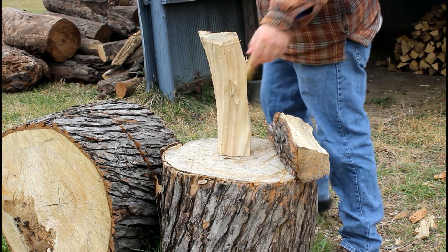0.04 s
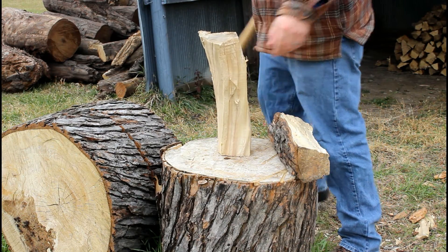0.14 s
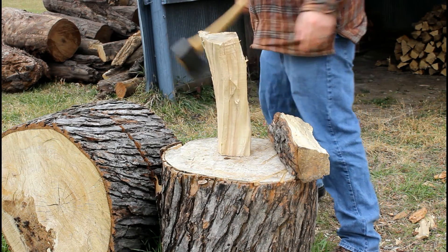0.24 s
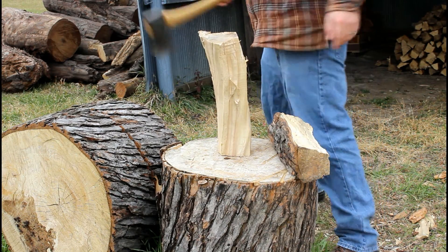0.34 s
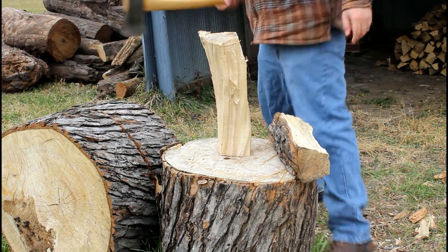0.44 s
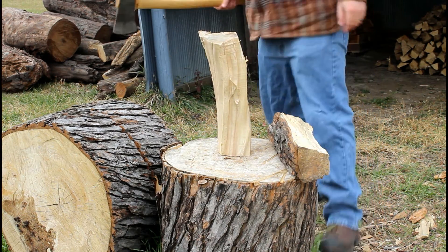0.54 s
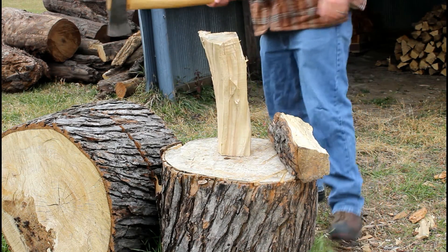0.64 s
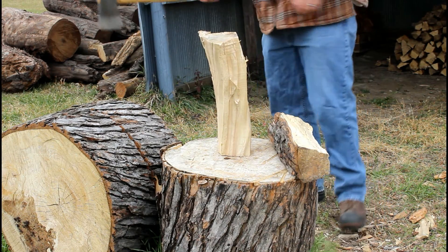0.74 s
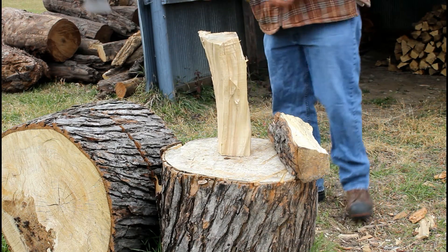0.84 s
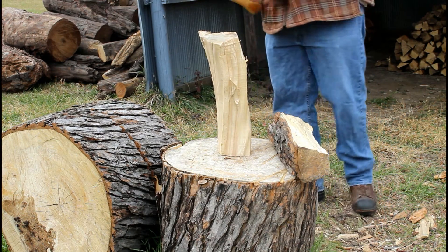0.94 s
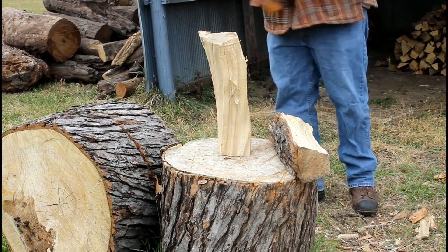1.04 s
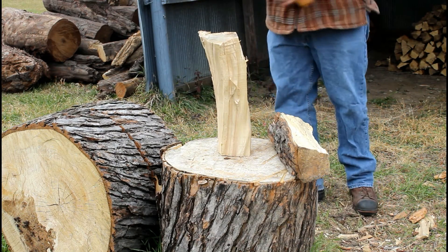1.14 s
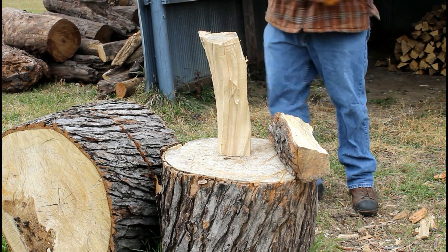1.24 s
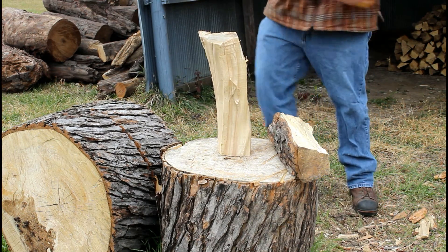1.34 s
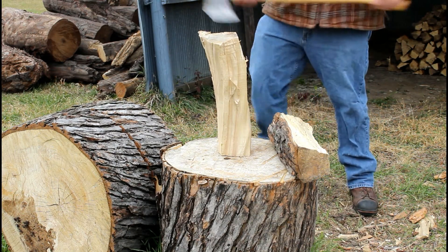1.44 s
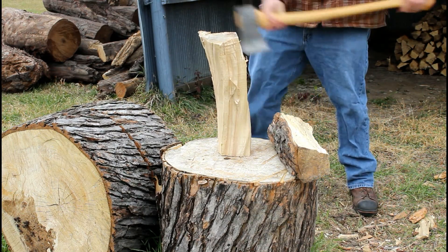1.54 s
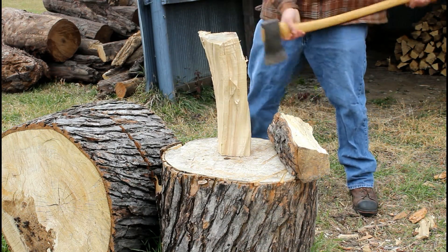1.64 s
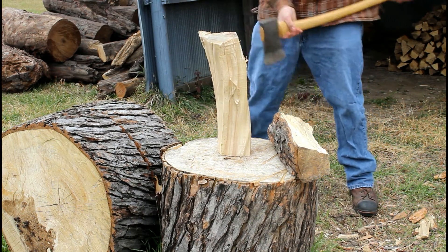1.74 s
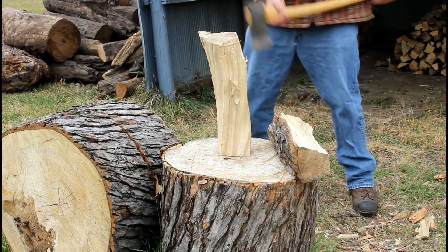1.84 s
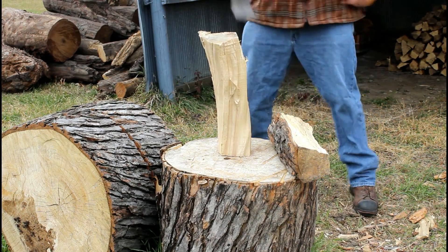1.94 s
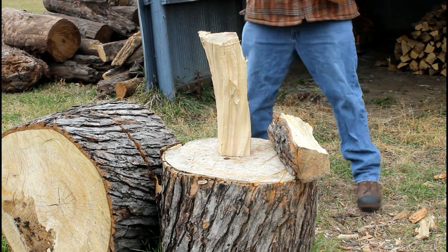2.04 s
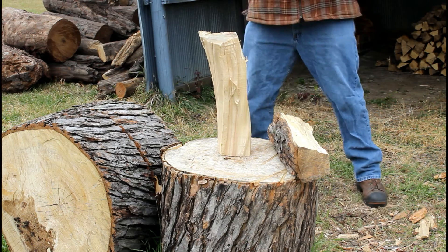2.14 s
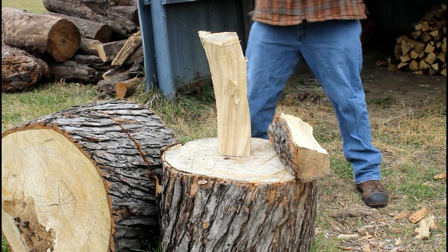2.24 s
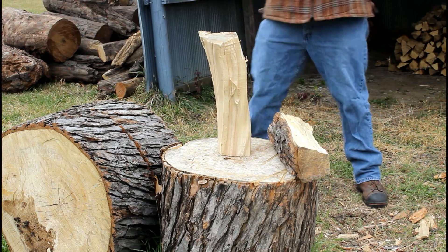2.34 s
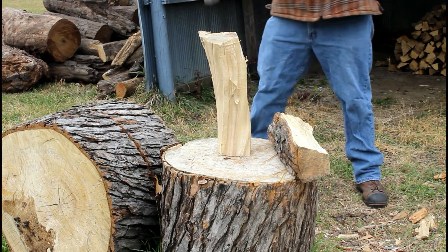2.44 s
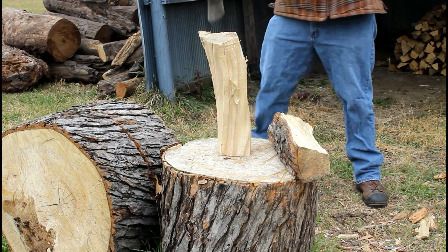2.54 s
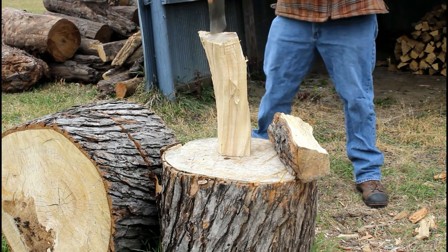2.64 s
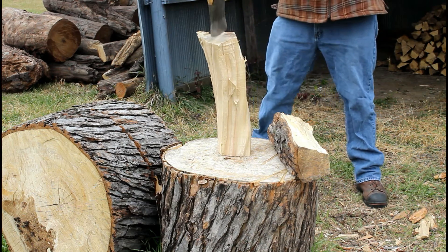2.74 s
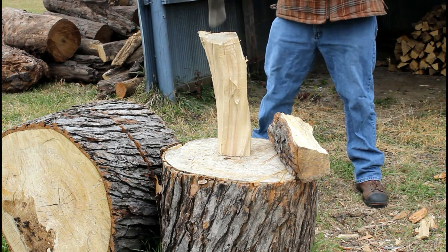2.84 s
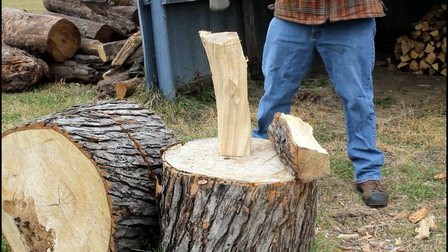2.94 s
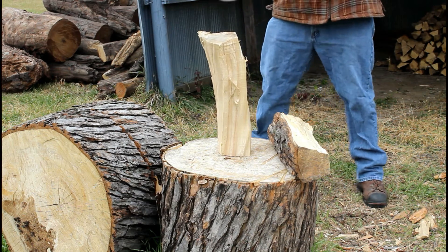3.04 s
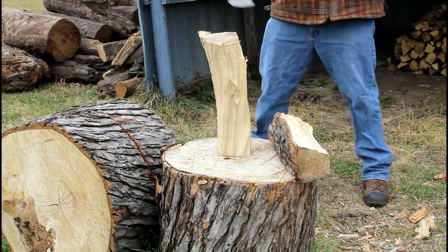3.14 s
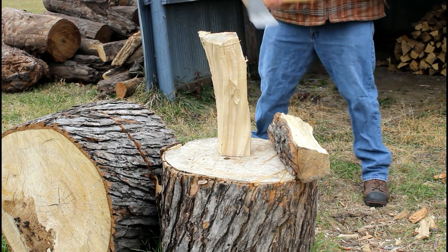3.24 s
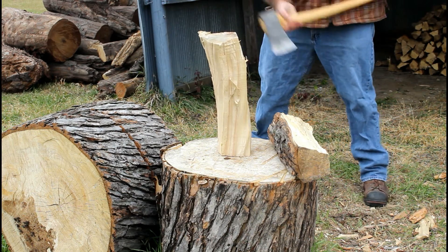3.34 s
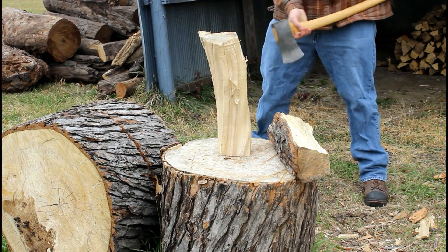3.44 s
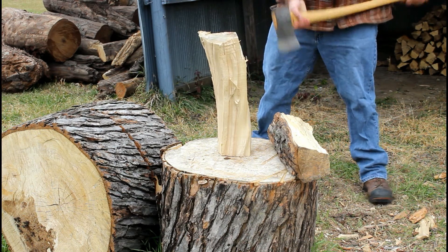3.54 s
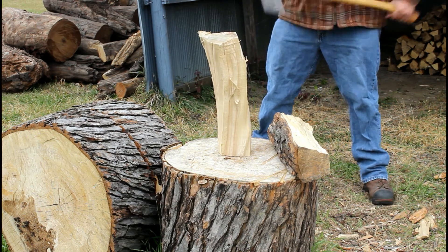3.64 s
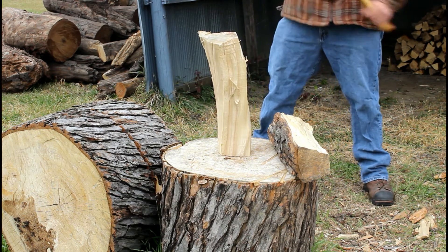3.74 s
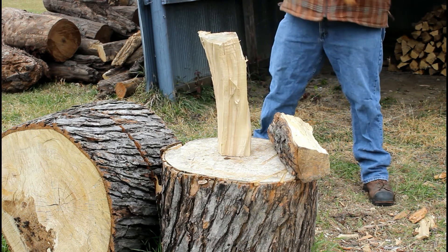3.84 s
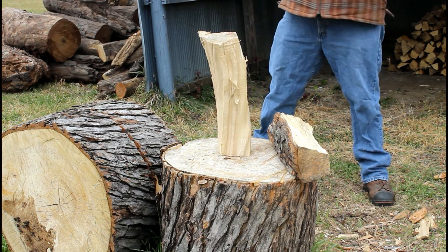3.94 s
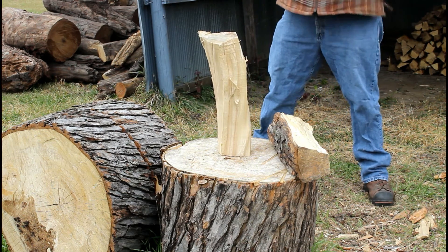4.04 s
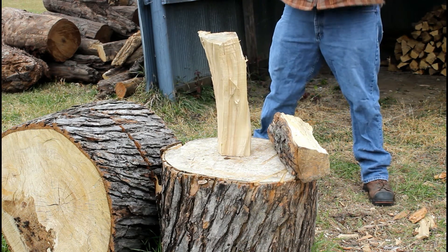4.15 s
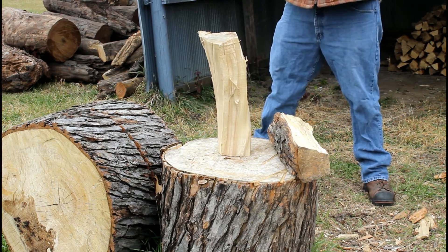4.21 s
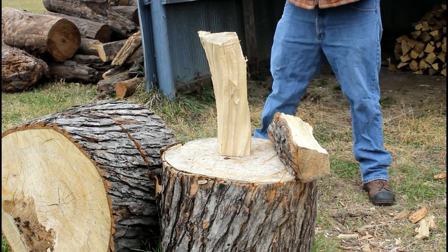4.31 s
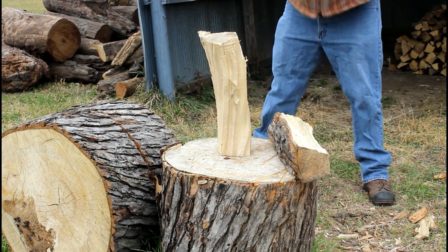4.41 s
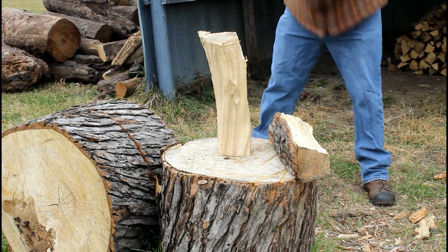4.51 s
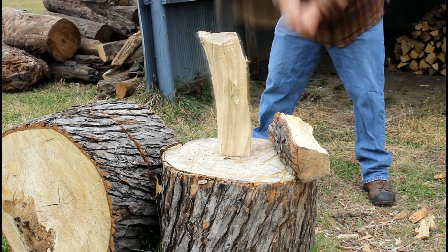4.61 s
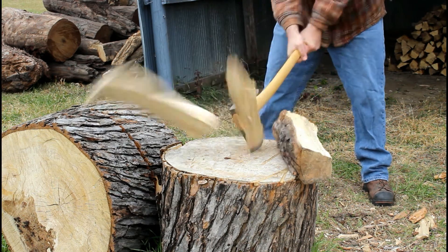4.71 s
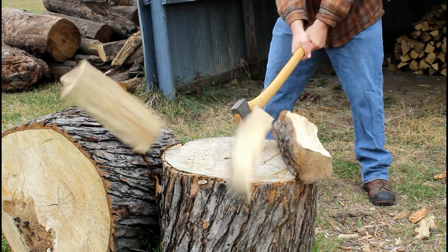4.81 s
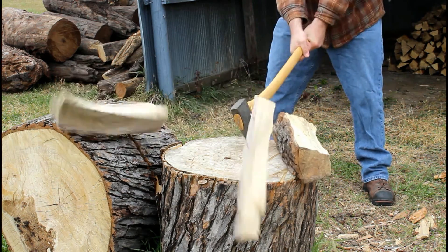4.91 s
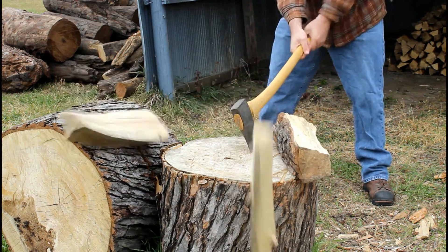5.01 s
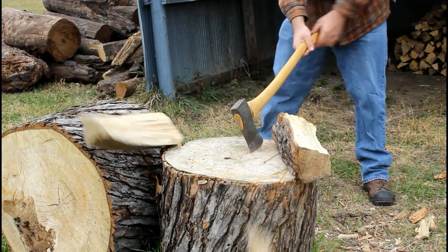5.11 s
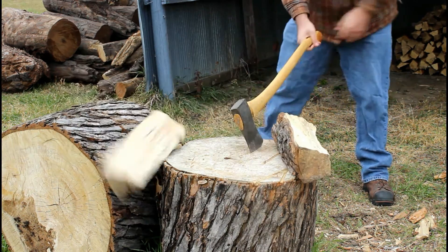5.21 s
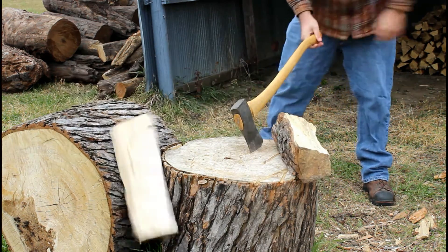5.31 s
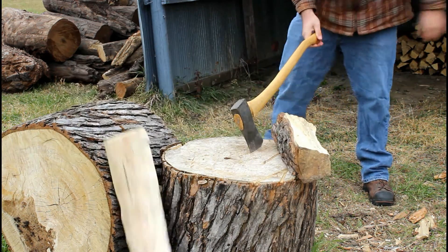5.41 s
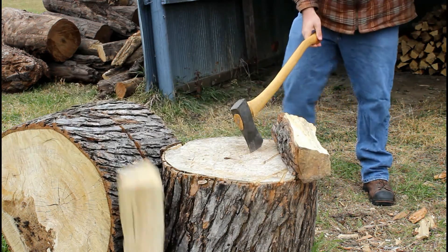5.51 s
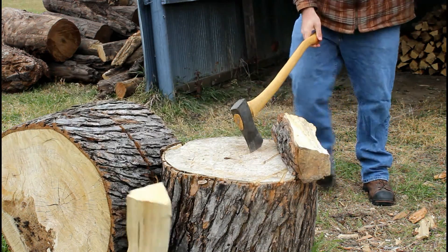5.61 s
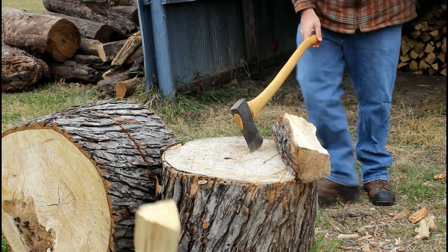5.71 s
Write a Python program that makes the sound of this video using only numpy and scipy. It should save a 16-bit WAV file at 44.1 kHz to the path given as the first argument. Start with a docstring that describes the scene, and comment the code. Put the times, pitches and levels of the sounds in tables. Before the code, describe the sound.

A very quiet outdoor yard, heard close: low soft air noise, a barely audible distant hum, a brief low breeze rumble at the start. From 0 to 4 seconds, hands and sleeves brush along a wooden handle in short swelling hisses that stop quickly, with small dull taps around 0.1, 0.3, 1.3, 3.2 and 3.6, sparse grit ticks and barely felt footfalls. At 2.73 the blade lightly taps the log, a small knock with a soft low thud. The air swells slightly before 4.69, when the chop bursts: loud, overloaded crack, ripping fibres, a brief steel edge and a heavy ground jolt, clustered within 50 milliseconds. Hollow wooden knocks follow at 4.82, 4.89, 5.0 and 5.27, with low thuds as halves bounce, smaller bumps at 5.4 and a final soft one at 5.63. Short dull shed echoes, faint debris rustle, then quiet yard air.

```python
"""Splitting a log with an axe

An axe is aimed at a log on a chopping block beside a shed, then splits it; halves bounce off a log and grass.
Blows are damped sines, wood modes and noise bursts; tearing, debris, sliding hands and breeze are banded noise.
Handle and boots tap, grit ticks and a far hum wavers; footfalls and blows through the soil are low damped
swings that shake a stand. The shed answers with early echoes and a diffuse tail."""
import sys
import numpy as np
from scipy import signal
from scipy.io import wavfile

SR = 44100
rng = np.random.default_rng(int(sys.argv[2]) if len(sys.argv) > 2 else 0)


def transcribe(signal):
    """Save signal, clipped to [-1, 1], as a 16-bit WAV file at the path in sys.argv[1]."""
    frames = np.atleast_2d(signal).T
    limited = np.clip(frames, -1, 1)
    pcm = np.round(limited * 32767).astype(np.int16)
    wavfile.write(sys.argv[1], SR, pcm)


N = 254456

# Modes of the split halves and block: pitch_hz, level_db (relative), t60_s
WOOD = [(163, -6, 0.13), (216, -9, 0.21), (261.5, -22.5, 0.098), (331.5, -1, 0.051), (379, -12.5, 0.065),
        (504.5, -17.5, 0.12), (525.2, -12.5, 0.12), (710, -27.5, 0.068), (806, -10, 0.036),
        (908, -7.5, 0.029), (979, -11.5, 0.035), (1035, -5.5, 0.02), (1124, -20.5, 0.031),
        (1278, -12, 0.038), (1425, -21.5, 0.063), (1478, -2, 0.026), (1579, -3.5, 0.032),
        (1750, -10, 0.025), (2060, -11.5, 0.013), (2260, -28.5, 0.014), (2640, -20, 0.035),
        (3220, -9.5, 0.025)]
# Left-right likeness of the far sounds: pitch_hz, likeness (1 = same, -1 = opposite)
LIKENESS = [(60, 0.78), (180, 0.88), (550, 0.75), (1650, 0.28), (4970, 0.39), (15000, -0.27)]
NEAR = [(200, 1.0), (10000, 0.24)]   # the same columns for falling and torn wood


def from_db(db):
    """Amplitude ratio of a level: 20 dB for each factor of ten."""
    return 10 ** (np.asarray(db) / 20)


def rms_one(x):
    """Normalization to unit effective value."""
    return x / np.sqrt(np.mean(x ** 2) + 1e-20)


def in_time(rows):
    """Linear interpolation of columns over time, at -200 outside the table."""
    s, *columns = np.transpose(rows)
    return [np.interp(np.arange(N) / SR, s, c, left=-200, right=-200) for c in columns]


def at_hz(points, hz):
    """Linear interpolation over logarithmic frequency."""
    points_hz, values = np.transpose(points)
    return np.interp(np.log(hz), np.log(points_hz), values)


def drift(rate):
    """Slow random fluctuation: white noise through a double low-pass pole at rate Hz, spread 1."""
    step = 40   # samples between computed points
    r = np.exp(-2 * np.pi * rate * step / SR)
    white = rng.standard_normal(N // step + 2002)
    slow = signal.lfilter([1], [1, -2 * r, r * r], white)[2000:]
    return np.interp(np.arange(N) / step, np.arange(len(slow)), rms_one(slow))


def decay(t, t60):
    """Exponential damping: a fall of 60 dB in t60 seconds."""
    return from_db(-60 * t / max(t60, .002))


def swell(t, rise, t60):
    """Quadratic growth to 1 over the build-up, then exponential damping."""
    rise = max(rise, .0002)
    return np.minimum(t / rise, 1) ** 2 * decay(np.maximum(t - rise, 0), t60)


def struck(t, modes, stir_db):
    """Modal superposition: decaying sines, each stirred by its own amount."""
    hz, level_db, t60 = np.transpose(modes)[:, :, None]
    amplitude = from_db(level_db + stir_db - 60 * t / t60)
    return np.sum(amplitude * np.sin(2 * np.pi * hz * t), axis=0)


def resonate(x, hz, width_hz):
    """Two-pole resonance, gain about 1 on top."""
    r = np.exp(-np.pi * width_hz / SR)
    poles = [1, -2 * r * np.cos(2 * np.pi * hz / SR), r * r]
    return signal.lfilter(np.array([1, 0, -1]) * (1 - r * r) / 2, poles, x)


def add(out, sound, s, pan_db):
    """Superposition at time s, with a level difference pan_db from left to right."""
    i = round(s * SR)
    placed = sound * from_db([[pan_db / 2], [-pan_db / 2]])
    out[:, i:i + sound.shape[-1]] += placed[:, :N - i]


def band(x, low, high, order):
    """Band-pass filtering between two frequencies in Hz."""
    return signal.sosfilt(signal.butter(order, [low, high], "band", fs=SR, output="sos"), x)


def burst(t, rise, t60, treble_db, alike):
    """Transient stereo noise with random crackle: a dull body and a hissing top that builds up sooner."""
    mid, side = rng.standard_normal((2, len(t)))
    grains = np.repeat(rng.standard_normal(len(t) // 30 + 1), 30)[:len(t)]
    crackle = from_db(4.1 * grains)   # fibres let go unevenly
    noise = crackle * (mid + (1 - alike) * side * [[1], [-1]])
    body = rms_one(band(noise, 250, 2500, 2)) * swell(t, rise, t60)
    top = rms_one(band(noise, 2500, 6000, 1)) * swell(t, 0.15 * rise, 1.15 * t60)
    return body + from_db(treble_db) * top


def banded_noise(spectrum, patchy_db, rate, likeness, moving_db=np.zeros_like):
    """Spectral synthesis: half-octave bands of stereo noise, each with its own level and flicker; rms 1."""
    out, together = 0, drift(rate)
    edges = 20 * 2 ** np.arange(0, 10.1, .5)
    white = rng.standard_normal((2, 2, N))
    for k, (low, high) in enumerate(zip(edges, edges[1:])):
        hz = np.sqrt(low * high)
        if not spectrum[0][0] * .8 < hz < spectrum[-1][0] * 1.1:
            continue
        mid, side = band(white[k % 2], low, high, 2)   # neighbouring bands use separate noise
        alike = np.clip(at_hz(likeness, hz), -1, 1)
        flicker_db = patchy_db * (0.3 * together + drift(rate))
        gain = from_db(at_hz(spectrum, hz) + moving_db(hz) + flicker_db)
        stereo = np.sqrt(1 + alike) * mid + np.sqrt(1 - alike) * side * [[1], [-1]]
        out = out + gain * stereo
    return rms_one(out)


def knocks():
    """Impact excitation: splinter noise, a damped knock and wood modes; some blows also ring steel modes."""
    # Wood blows: full_contact_s, level_db, knock_hz, knock_t60_s, ring_db (relative), ring_centre_hz,
    # splinter_db (relative), splinter_treble_db, left_minus_right_db
    blows = [(2.734, -32, 733, 0.01, -10, 1210, -18, -12, 1),
             (2.7378, -18, 283, 0.014, -11, 765, -32.5, -5.5, 4),
             (4.6915, -2.5, 538, 0.062, 0.5, 328, -5, -9.5, 9),
             (4.699, -17, 575, .055, -21, 1200, -13, -8, 12),
             (4.711, -8.5, 1220, 0.011, -18, 980, -11.5, -5, 2),
             (4.724, 3.5, 389, .012, -8, 2000, -11.5, -22, 4.5),
             (4.7255, -7.5, 1970, .029, -5, 2700, -14, -22, 8),
             (4.736, -1, 573, 0.039, -6, 236, -20, -17.5, 15),
             (4.8155, -3.5, 495.5, 0.061, 4.5, 930, -17.5, -36, 7.5),
             (4.888, -2.5, 518, 0.057, 5, 478, -30.5, -8.5, 3),
             (4.923, -16, 230, 0.015, 4, 970, -23.5, -14, 6),
             (5.003, -3, 307, 0.013, -10.5, 1140, -22.5, -19, 4),
             (5.008, -19.5, 1040, 0.038, 5, 510, -15, -18, 7.5),
             (5.082, -27, 206, 0.014, -19, 1480, -1.5, -5, 3),
             (5.095, -28, 200, .043, -10, 1500, -14, -5.5, -1),
             (5.122, -10, 273, 0.011, -4, 920, -22, -22, 10),
             (5.152, -35, 230, 0.02, -13, 1200, -5.5, -15, 8),
             (5.185, -20, 221, 0.008, -21, 1700, -17.5, -24, 11.5),
             (5.208, -24, 210, 0.033, -26, 1700, -12.5, -22, 7),
             (5.226, -32.5, 460, 0.052, -19, 1665, -10, -27, 18),
             (5.2725, -2, 454, 0.0075, -4.5, 1120, -27.5, -36, 8.5),
             (5.295, -25.5, 267, 0.041, -17, 595, -23.5, -9, 18.5),
             (5.323, -27, 231, 0.026, -5, 510, -36, 1, 0),
             (5.389, -10, 207, 0.017, -33, 1000, -23, -3.5, 5),
             (5.4025, -16, 227, 0.027, 7, 1540, -11.5, -12.5, 9),
             (5.428, -36.5, 237, 0.048, 8, 1480, -1, -11, 0),
             (5.4575, -26, 976, .049, 8, 1086, -14, -16, 5.5),
             (5.613, -42.5, 1330, .03, -21.5, 1410, -4.5, -16, 2),
             (5.621, -42, 1300, 0.017, -10, 2100, 0, -7, 2),
             (5.627, -28, 190, 0.028, -0.5, 1515, -12, -13.5, 7)]
    # Axe head modes: pitch_hz, level_db (relative to the blow), t60_s
    steel = [(2830, -43, .2), (2900, -44, .12), (5233, -54, .12)]
    # Row numbers of the blows made by the blade
    steel_struck = [1, 2]
    build_up_s, splinter_t60_s, crack_t60_s = .003, 0.041, 0.0029   # of a blow at 0 dB
    glance_db = 40   # a blow weaker by this much glances: it builds up and splinters twice as long
    crack_db = -6.5   # short bright crack, relative to the splinter noise
    ring_octaves = .45   # distance from the centre at which a mode is stirred 6 dB less
    linger_db, linger_times = -26, 2   # a faint part rings longer once the piece is free in the air
    right_turn = 0.41   # radians of phase at the far microphone, after the way round the block

    out, t = np.zeros((2, N)), np.arange(SR // 3) / SR
    wood_hz = np.array(WOOD)[:, :1]
    lingering_wood = np.multiply(WOOD, [1, 1, linger_times])
    for k, (s, db, hz, t60, ring_db, centre_hz, noise_db, treble_db, pan_db) in enumerate(blows):
        slower = 2 ** (-db / glance_db)
        rise = build_up_s * slower
        approach = np.minimum(t / rise, 1)
        phase = 2 * np.pi * hz * (t - rise) - right_turn * np.array([[0], [1]])
        knock = np.cos(phase) * swell(t, rise, t60) * approach
        # modes near the centre are stirred most, each with some luck
        octaves_off = np.log2(wood_hz / centre_hz)
        stir_db = -6 * (octaves_off / ring_octaves) ** 2 + rng.normal(0, 2.0, wood_hz.shape)
        ring = struck(t, WOOD, stir_db) + struck(t, lingering_wood, stir_db + linger_db)
        splinters = burst(t, rise, splinter_t60_s * slower, treble_db, alike=0.41)
        crack = burst(t, rise, crack_t60_s, treble_db + 3.0, alike=0.35)
        sound = knock + from_db(ring_db) * ring * approach ** 3
        sound = sound + from_db(noise_db) * (splinters + from_db(crack_db) * crack)
        if k in steel_struck:
            sound = sound + struck(t, steel, 0) * approach ** 3
        add(out, from_db(db) * sound, s - rise, pan_db)
    return out


def woody(x):
    """Forced vibration: a rubbing noise plus the wood modes that it keeps ringing."""
    modes_db = -9   # all modes together, relative to the rubbing noise
    # bandwidth follows from the decay time
    rings = sum(from_db(db) * resonate(x, hz, np.log(1000) / (np.pi * t60)) for hz, db, t60 in WOOD)
    return x + from_db(modes_db) * rms_one(rings) * np.std(x)


def tearing():
    """Fracture noise: fibres tearing as the blade runs through, shaped in time and spectrum."""
    # Level of the tearing before its modes: time_s, level_db
    course = [(4.678, -57), (4.685, -27.5), (4.688, -22.5), (4.70, -7.5), (4.718, -30), (4.74, -14),
              (4.76, -27.5), (4.8, -36.5), (4.83, -52)]
    # Tearing spectrum: pitch_hz, density_db (relative, per Hz)
    colour = [(200, 3.5), (500, 6.5), (1500, -3.5), (3000, -10), (6000, -18), (10000, -20.5), (15700, -31)]
    noise = banded_noise(colour, patchy_db=2.0, rate=60, likeness=NEAR)
    return woody(from_db(in_time(course)[0]) * noise)


def debris():
    """Friction noise: chips and grass stirred by the falling halves."""
    # Level of the debris before its modes: time_s, level_db
    course = [(4.8, -45), (4.9, -46.5), (5.3, -55), (5.48, -51), (5.62, -71.5), (5.77, -91)]
    # Debris spectrum: pitch_hz, density_db (relative, per Hz)
    colour = [(200, 21), (500, 13.5), (1500, 7), (3000, 0.5), (6000, -6.5), (15700, -13)]
    noise = banded_noise(colour, patchy_db=3.5, rate=38, likeness=NEAR)
    return woody(from_db(in_time(course)[0]) * noise)


def thuds():
    """Structure-borne sound: the soil heaves and drops, then the stand swings at its own low modes."""
    # Footfalls (first four rows) and blows carried by the soil: deepest_dip_s, level_db, swing_hz, t60_s
    soil_thuds = [(1.062, -53.5, 62.6, .6), (1.758, -53, 60.4, .3), (2.219, -53, 57, 1),
                  (2.511, -57, 62, 0.37), (2.748, -22.5, 91, 0.071), (2.794, -26.5, 53.5, 0.16),
                  (4.702, -3, 72, 0.018), (4.7484, 2, 80, 0.01), (4.778, -9.5, 59.5, 0.11),
                  (4.828, 3.5, 44.8, 0.12), (4.886, -4.5, 40.4, 0.031), (5.013, -6.5, 53.6, 0.14),
                  (5.095, -8.5, 49, 0.16), (5.146, -18, 50.2, 0.27), (5.311, -22, 61, 0.12),
                  (5.402, -7, 48.7, 0.13), (5.450, -17, 51.3, 0.035), (5.468, -13, 53.8, 0.19),
                  (5.627, -19, 49.5, 0.077)]
    # Stand modes: pitch_hz, level_db (relative), t60_s
    stand = [(32.24, 3, 0.9), (41.35, 5.5, 0.48), (50.94, 5.5, 0.62), (66.4, 0.5, 0.33)]
    heave_cycles = 0.7   # the soil heaves for this long before the dip
    stand_db = -22.5   # share that reaches the stand
    twist_db = -10   # sideways rocking, opposite in the two microphones

    out, t = np.zeros((2, N)), np.arange(SR) / SR
    swing = struck(t, stand, 0) * np.minimum(t / .02, 1)
    for s, db, hz, t60 in soil_thuds:
        rise = heave_cycles / hz
        onset = np.sin(np.pi / 2 * np.minimum(t / rise, 1))
        push = np.cos(2 * np.pi * hz * (t - rise)) * onset * decay(np.maximum(t - rise, 0), t60)
        add(out, -from_db(db) * (push + from_db(stand_db) * swing), s - rise, -1.5)
    twist = rms_one(np.gradient(out.mean(axis=0))) * np.std(out)
    return out + from_db(twist_db) * twist * [[1], [-1]]


def touches():
    """Heavily damped impacts: a dull body, a higher tick and a noisy click."""
    # Light touches of boots, handle and twigs: start_s, level_db, body_hz, tick_hz,
    # tick_db (relative), click_db (relative)
    taps = [(.093, -39.5, 420, 1430, -4.5, -12), (.309, -38, 304.7, 1550, -14, -5.5),
            (.395, -49, 360, 1640, -2, -1), (.551, -48, 254, 2840, 4, -0.5), (.594, -59.5, 307, 1440, 6, 6),
            (.63, -60, 338, 2140, 12, 7), (.781, -50, 456, 1510, 2.5, -5), (.815, -55.5, 314, 1550, 3, 3),
            (.989, -49, 393, 1240, -45, -23), (1.18, -57.5, 316, 2640, 10, -20),
            (1.338, -36.5, 310, 1420, -12, -28), (1.697, -49.5, 447, 1410, -2, -12.5),
            (2.189, -46.5, 457, 1200, -1, -24.5), (2.569, -47, 377, 1570, -15, -22),
            (2.832, -52.5, 330, 3620, -8, -23), (3.185, -37, 438, 1230, -17, -12),
            (3.579, -41.5, 262, 1110, -3, -25), (3.6, -39, 292, 1250, -17, -33),
            (3.788, -59, 364, 1320, -6, -11)]
    t60, treble_db, pan_db = 0.018, -7, 3.5   # seconds, dB of the click's top, dB left minus right
    out, t = np.zeros((2, N)), np.arange(SR // 8) / SR
    for s, db, body_hz, tick_hz, tick_db, click_db in taps:
        body = np.sin(2 * np.pi * body_hz * t) * swell(t, 0.0016, t60)
        tick = np.sin(2 * np.pi * tick_hz * t) * swell(t, 0.0011, t60 / 2)
        click = burst(t, 0.0011, t60, treble_db, alike=0.3)
        tap = body + from_db(tick_db) * tick + from_db(click_db) * click
        add(out, from_db(db) * tap, s, pan_db)
    return out


def slides():
    """Friction noise of hands and sleeves: the cupped hand adds a resonance, its pressure tilts the hiss."""
    # Slides: full_s, build_up_s, hold_s, skin_db, cloth_db, resonance_hz, tilt_db_per_octave
    strokes = [(0.518, 0.2, 0.012, -53.5, -64, 3060, 1), (0.992, .04, 0.023, -58.5, -57.5, 2420, 2),
               (1.178, .08, 0.0084, -63.5, -83, 3040, -3.5), (1.358, .2, 0.14, -57, -75.5, 4500, 2),
               (1.661, 0.3, 0.059, -67, -67, 4220, 2.5), (2.102, 0.34, 0.11, -57, -64, 4560, 1.5),
               (2.567, 0.19, 0.032, -61.5, -57.5, 4040, 3.5), (3.08, 0.21, 0.16, -65.5, -76.5, 4270, 0.5),
               (3.27, 0.065, 0.028, -56, -71, 3300, 1), (3.608, 0.13, 0.012, -74.5, -63, 2860, 0.5),
               (3.915, 0.16, 0.14, -56, -76, 4540, 1.5)]
    # Skin hiss spectrum: pitch_hz, density_db (relative, per Hz)
    skin_colour = [(880, -74), (1500, -7), (1770, 4), (2570, -1), (4460, -0.5), (5120, -1), (5880, -2),
                   (10700, -1), (13700, -9.5), (15700, -25)]
    # Cloth rustle spectrum: pitch_hz, density_db (relative, per Hz)
    cloth_colour = [(250, 15), (600, 7.5), (1000, 6), (2000, 2.5), (3000, -8), (6000, -28)]
    build_db, let_go_db_per_s = 28, 279   # growth over the build-up; fast stop
    fidget_skin_db, fidget_cloth_db = -77.5, -68.5   # the hands never rest entirely before the swing ends
    swing_ends_s = 4.68

    t, near = np.arange(N) / SR, [(200, 1.0), (10000, 0.3)]
    full, build, hold, skin_db, cloth_db, grip_hz, tilt = np.transpose(strokes)[:, :, None]
    growth_db = -build_db * np.maximum(full - t, 0) / build
    shape_db = growth_db - let_go_db_per_s * np.maximum(t - full - hold, 0)
    holding = t < swing_ends_s
    skin = (from_db(skin_db + shape_db).sum(axis=0) + from_db(fidget_skin_db)) * holding
    cloth = (from_db(cloth_db + shape_db).sum(axis=0) + from_db(fidget_cloth_db)) * holding
    peak_hz = np.interp(t, full[:, 0], grip_hz[:, 0])
    tilt_db = np.interp(t, full[:, 0], tilt[:, 0])

    def grip_db(hz):
        """Moving resonance of the hand plus a spectral tilt about 6000 Hz."""
        return 4.5 * np.exp(-(np.log2(hz / peak_hz) / 0.65) ** 2) + tilt_db * np.log2(hz / 6000)

    hiss = banded_noise(skin_colour, patchy_db=2.0, rate=35, likeness=near, moving_db=grip_db)
    rustle = banded_noise(cloth_colour, patchy_db=3.0, rate=19.5, likeness=near)
    return skin * hiss + cloth * rustle


def grit():
    """Random impulses into resonances: faint ticks of grit and twigs at scattered pitches."""
    ticks_per_s, faintest_db = 12, -65   # level before the resonances
    sizes = from_db(faintest_db + 2.9 * np.minimum(rng.exponential(1, N), 3))
    sizes = sizes * (rng.random(N) < ticks_per_s / SR)
    pitches, dealt = np.geomspace(1400, 7000, 8), rng.integers(0, 8, N)
    # each pitch rings a few cycles; the tiny offset keeps the filter from stalling on zeros
    return sum(resonate(sizes * (dealt == k) + 1e-18, hz, hz / 6.0) * SR / hz
               for k, hz in enumerate(pitches))


def shed(x):
    """Reflection and reverberation: dull early echoes, then a diffuse tail of its own in each channel."""
    # Echoes off shed walls and log piles: delay_s, left_db, right_db
    echoes = [(.0045, -19.5, -17), (.011, -34, -17.5), (.019, -18, -24.5), (.031, -22.5, -29),
              (0.042, -25.5, -25)]
    tail_db, tail_t60_s, cut_hz = -20.5, 0.18, 2200
    t = np.arange(SR // 2) / SR
    tail = rng.standard_normal((2, len(t))) * decay(t, tail_t60_s) * np.minimum(t / 0.0081, 1)
    response = from_db(tail_db) * tail / np.sqrt(np.sum(tail[0] ** 2))
    for delay, left_db, right_db in echoes:
        response[:, round(delay * SR)] += from_db([left_db, right_db])
    dull = signal.sosfilt(signal.butter(1, cut_hz, fs=SR, output="sos"), x.mean(axis=0))
    return signal.fftconvolve(dull[None], response, axes=1)[:, :N]


def yard():
    """Broadband ambient noise: the spectrum of the yard under a slowly swelling level."""
    # Yard spectrum: pitch_hz, density_db (relative, per Hz)
    colour = [(30, -15), (50, 3), (80, 4), (160, -0.5), (270, -5.5), (390, -3.5), (550, -11.5), (800, -22),
              (1700, -17.5), (4000, -26.5), (9800, -33), (13900, -30.5), (15700, -51.5)]
    # Slow swells of the yard noise, the last one with the swing: time_s, swell_db (relative)
    swells = [(0, -1.5), (.5, 0.5), (1, 0), (1.5, -3.5), (2, 0.5), (2.5, -0.5), (3, -2.5), (3.5, -2),
              (4, -1.5), (4.5, 0.5), (4.68, 5.5)]
    swell_db = np.interp(np.arange(N) / SR, *np.transpose(swells))
    return from_db(-62.5 + swell_db) * banded_noise(colour, patchy_db=.6, rate=6, likeness=LIKENESS)


def hum():
    """Narrow-band noise: a resonance 25 Hz wide makes a faint far hum that wavers."""
    return from_db(-78.5) * rms_one(resonate(rng.standard_normal(N), hz=360, width_hz=25))


def breeze():
    """Turbulence noise: low rumble of air over the microphone ports, its level wandering."""
    # Breeze level: time_s, level_db
    course = [(0.0, -52), (.2, -69.5), (.42, -59), (.6, -70), (1.3, -71.5), (4.0, -72.5), (4.45, -76),
              (4.66, -62)]
    colour = [(20, -7), (50, -19.0)]   # Hz, relative dB per Hz
    noise = banded_noise(colour, patchy_db=4.0, rate=3.8, likeness=LIKENESS)
    return from_db(in_time(course)[0]) * noise


def scene():
    """Superposition of the blows, their reverberation, the soil-borne thuds and the noises."""
    blows = knocks() + touches() + grit()
    left_side = from_db([[1.2], [-1.2]])   # the noises lean to the left
    noises = tearing() + debris() + slides() + yard() + hum() + breeze()
    return blows + shed(blows) + thuds() + left_side * noises


def record(dry):
    """Clipping and band limitation: peaks overload the input; the top is cut at 16000 Hz."""
    clipped = np.clip(dry, -.96, .96)
    return signal.sosfilt(signal.cheby2(18, 60, 16000, fs=SR, output="sos"), clipped)


dry = scene()
out = record(dry)
transcribe(out)
```